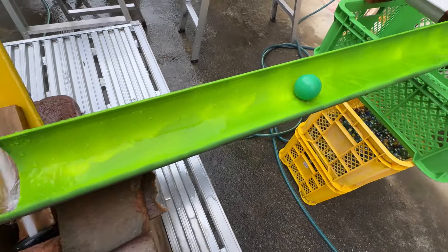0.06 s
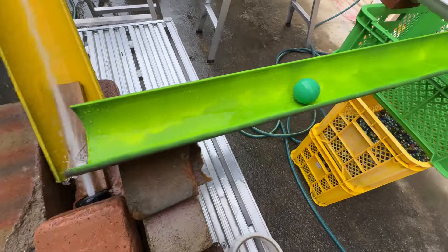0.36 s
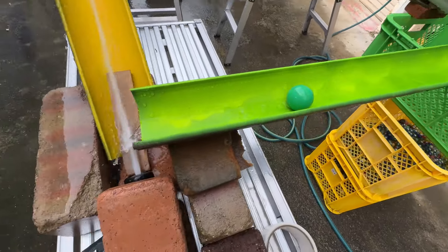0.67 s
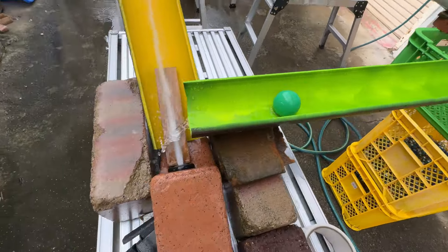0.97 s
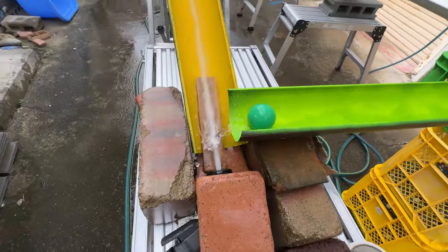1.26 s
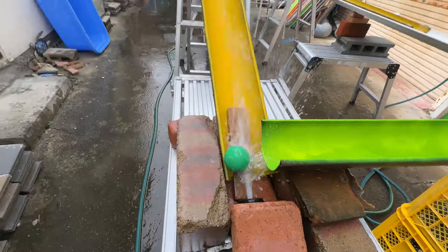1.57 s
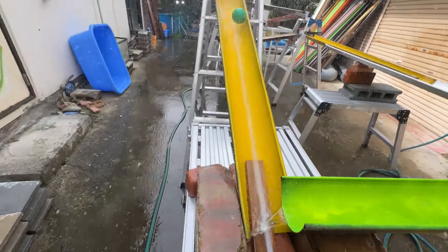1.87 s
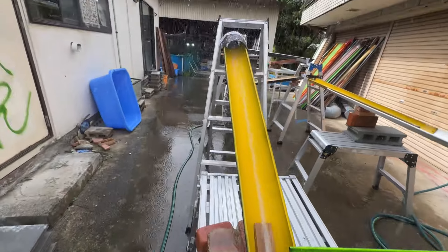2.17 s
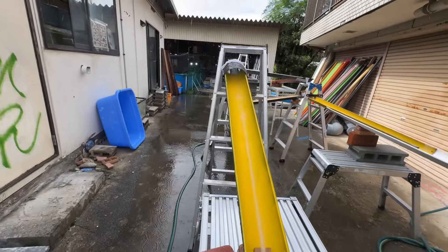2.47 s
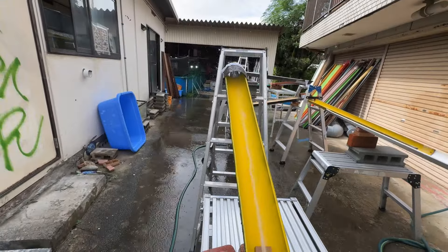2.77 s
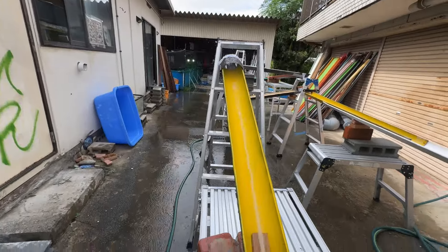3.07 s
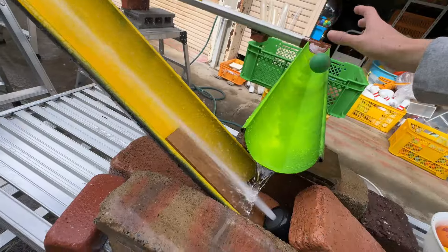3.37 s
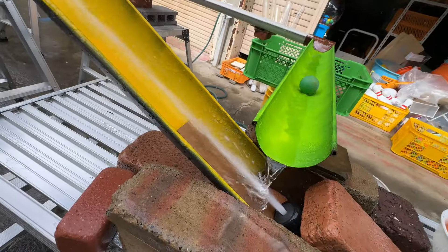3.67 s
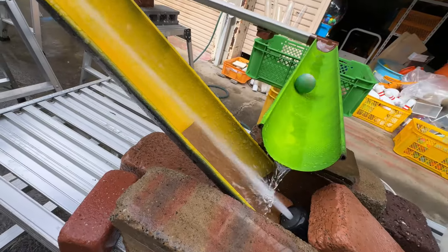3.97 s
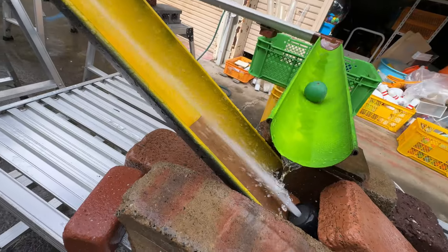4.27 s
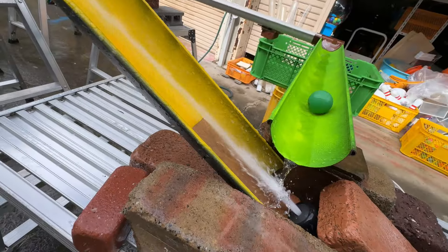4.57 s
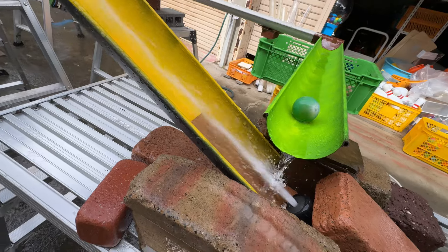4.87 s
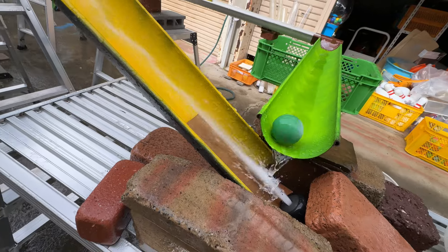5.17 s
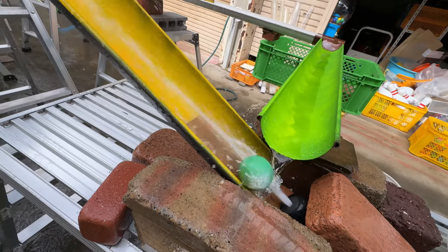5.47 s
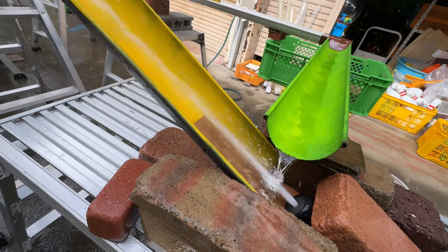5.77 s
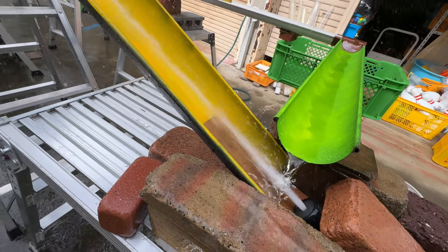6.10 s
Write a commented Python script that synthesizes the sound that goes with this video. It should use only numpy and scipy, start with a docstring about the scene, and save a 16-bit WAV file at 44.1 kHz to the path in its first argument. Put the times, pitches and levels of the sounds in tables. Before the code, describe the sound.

Close to a plastic gutter outdoors, pressurised water sprays with a constant bright hiss and hollow drumming. A wooden ball rolls with a low drone, lands with a clack and chatters off up the slope on the jet. After some small drips the spray shifts in tone, and another ball knocks onto the chute, rolls softly, clacks into the gutter and is swept off with short splashes. Wind rumbles lightly on the microphone.

```python
"""A pressure-washer jet hisses and drums up a plastic gutter in a yard, heard from the gutter's foot as
gusts rumble on the microphone. A wooden ball drones down a side chute, knocks into the gutter at 1.5 s,
is caught by the jet and skids and clatters away up the slope, while the microphone tilts to look up it.
A few drips plop. At 3.15 s the microphone is suddenly at the gutter's side. A ball rolls down again,
knocks in at 5.35 s and is driven away too, among splashes."""
import sys
import numpy as np
from scipy import signal
from scipy.fft import rfft, irfft
from scipy.io import wavfile

SR = 44100
rng = np.random.default_rng(int(sys.argv[2]) if len(sys.argv) > 2 else 0)


def int16_out(signal):
    """Quantize to a 16-bit WAV file."""
    q = np.round(np.clip(np.atleast_2d(signal).T, -1, 1) * 32767)
    wavfile.write(sys.argv[1], SR, q.astype(np.int16))


N = 275184
TIME = np.arange(N) / SR
HZ = np.maximum(np.arange(N // 2 + 1) * SR / N, 1)

# Where the microphone is. Each row: time in seconds, share at the foot, share looking up.
# The share left over is at the side.
MIC_PLACE = [(0, 0.96, 0), (1.55, 1, 0), (1.83, 0.028, 0.82), (3.148, 0.12, 0.99), (3.156, 0.29, 0.058),
             (6.24, 0.4, 0)]
# The tone of the water from those three places. Each row: frequency in Hz, left dB, right dB.
# Water drumming on the gutter wall:
DRUM_FOOT = [(100, -41, -15), (307, -14, -15), (533, -8, -9.5), (680, -1, -1.5), (860, -6.5, -5),
             (1050, -3, -7), (1380, -0.1, -3), (1820, -0.5, -15), (2010, -4, -4), (2590, -16, -27)]
DRUM_UP = [(100, -29, -29), (298, -14, -15.5), (537, -11, -11.5), (670, -3.5, -3), (920, -10.5, -6.5),
           (1050, -4, -2), (1500, -2, -11), (1860, 1.5, -5.5), (2015, -1, -17), (2620, -48, -37)]
DRUM_SIDE = [(98, -36, -31), (194, -10, -13), (326, -12.5, -10.5), (520, -7, -11), (680, -4.5, -21),
             (930, -4, -17), (1020, -2.5, -2.5), (1450, 1, -12), (1740, -1.5, -3), (1890, -6.5, -15),
             (2570, -22, -22)]
# The spray:
SPRAY_FOOT = [(1790, -23, -29), (2320, -13.5, -13.5), (2800, -9, -10.5), (4530, -4.5, -11.5),
              (5150, 0.5, -12.5), (6250, -4.5, -5), (6470, 2, -7), (7230, -4.5, -6), (7680, -1, 0),
              (9050, -0.5, -1.5), (9400, -8, 5.5), (9530, -7.5, -0.5), (10860, -9.5, -11.5),
              (11800, -29.5, -29.0)]
SPRAY_UP = [(1740, -26, -35), (2270, -8.5, -10), (2880, -11.5, -16), (3550, -11.5, -16.5),
            (4970, -5, -12.5), (5360, 1, -11), (6050, -7.5, -14), (7600, -6.5, -7), (8200, -7, -7),
            (9300, -9, 2), (9700, -9, -0.5), (10900, -11, -8), (11800, -32.4, -30.6)]
SPRAY_SIDE = [(1830, -58, -42), (2290, -13.5, -10), (2920, -4.5, -8.5), (3580, -3, -9.5), (4380, 1, -3),
              (4450, 4.5, -10), (5300, 1.5, -2), (5750, -5.5, -5), (6300, 2, -0.5), (7300, -10.5, -4.5),
              (7800, -2.5, -1.5), (9100, -2, -0.5), (10100, -0.5, 2), (10970, -24, -10),
              (12000, -32.6, -18)]
# The thin hiss of the nozzle:
NOZZLE_FOOT = [(10300, -30, -30), (11430, -7, -4.5), (12100, -2.5, -5.5), (12900, -2, 1), (13600, -5, -6.5),
               (14600, -4, -4.5), (15600, -9, -8), (19000, -20, -20)]
NOZZLE_UP = [(10300, -27, -22.7), (11300, -1, 0), (12100, -2, -3.5), (13000, -5, -3), (14000, 0, -0.2),
             (14600, 1, -0.0), (15500, -2, -0.3), (19000, -22.1, -22.3)]
NOZZLE_SIDE = [(10100, -33.4, -8.5), (11160, -25, -6), (11900, -11, -14), (12100, -1, -4), (12550, 1, 0),
               (12900, -6, -3), (13600, -5, -6), (14500, -4, -5), (15500, -5, -4), (19000, -12, -13)]
# How the microphone's two openings hear the water. Each row: frequency in Hz, how alike they are
# from 0 to 1, how far the left is ahead in radians.
MIC_OPENINGS = [(100, 0.9, -2.5), (330, 0.8, 1.14), (794, 0, 1.5), (1770, 0.59, 3), (2650, 0.13, 1),
                (4000, 0.47, 2.0), (5030, 0.08, 2.5), (6430, 0.5, 0.44), (9280, 0.22, 2.95),
                (9770, 0.53, 0.94), (11200, 0.55, 3.5), (12570, 0.97, 1.57), (14000, .82, 1.5),
                (15700, .8, 0.2)]
# How loud the even jet is as the microphone moves. Each row: time in seconds, then the levels of
# drumming, spray and nozzle in dB.
JET_LEVELS = [(0, -33.5, -26, -27.5), (.9, -33.5, -25.5, -27), (1.33, -33, -25.5, -23.5),
              (1.72, -31, -25, -25), (1.84, -33, -24.5, -27), (2.1, -31, -23.5, -27.2),
              (3.145, -32.8, -26, -28.5), (3.16, -33, -26, -23.5), (5.3, -33.3, -26, -24),
              (6.24, -32.5, -25, -25)]
# Peaks in the water's tone: standing waves in the gutter low down, and a faint, even ripple above 4 kHz. # Each
# row: frequency in Hz, width in Hz, boost in dB.
WATER_PEAKS = [(296, 23, 2), (641, 26, 3), (1022, 51, 3.5), (2030, 54, 2), (4610, 170, 2),
               (5540, 160, 1), (6570, 200, 1), (9200, 220, 0), (12540, 280, -1.5)]
# The tones of the yard's background, the chute, the wind and the fizz of water on a ball.
# Each row: frequency in Hz, left dB, right dB.
YARD_TONE = [(45, -4, -12), (70, -29, -9), (117, -0.5, 2), (170, -8, -9), (260, -16, -14)]
CHUTE_TONE = [(70, -16, -16), (120, -9, -5), (175, 2.5, 0), (260, -8, -0.5), (400, 1, -13)]
WIND_TONE = [(15, -25, -28), (29.8, -17, -18), (61.6, 2.5, -6.5), (100, -5, -9), (166, -8, -13.5),
             (254, -15.5, -31.5), (500, -48, -27)]
FIZZ_TONE = [(2400, -14, -16), (3400, -14, -18), (4470, -8, -10), (7150, -11, -9), (9100, -6, 1),
             (9800, -8, -9), (12000, -27, -22)]
# A ball rolls along. Each row: landing and leaving times in seconds, thud in dB, full-speed drone in dB.
ROLLS = [(0, 1.45, -62, -49.5), (1.489, 1.86, -39, -40.5), (3.428, 5.35, -30, -56),
         (5.351, 5.853, -46, -41.5)]
# Gusts on the microphone. Each row: time of the peak in seconds, swell time in seconds, level in dB.
GUSTS = [(.05, 0.11, -50), (0.356, 0.11, -39), (0.64, 0.053, -37.5), (0.824, 0.043, -40),
         (1.037, 0.061, -34.5), (1.13, 0.03, -29), (1.316, 0.12, -40), (1.8, .13, -42),
         (3.08, 0.061, -40.5), (5.3, 0.5, -46)]
# Splashes. Each row: time of the peak in seconds, middle frequency in Hz, swell time in seconds,
# level in dB.
SPLASHES = [(.45, 8500, .18, -35), (3.183, 3550, .019, -33), (3.29, 3880, 0.013, -30),
            (3.42, 3700, 0.014, -34), (3.431, 8000, 0.0053, -19.5), (4.526, 4740, .03, -30),
            (4.965, 3100, 0.02, -35), (4.964, 1300, 0.042, -34), (5.355, 3700, 0.0065, -31),
            (5.388, 6250, 0.046, -28.5), (5.387, 1350, .025, -33), (5.66, 8550, 0.026, -23),
            (5.685, 3700, 0.024, -27.5), (5.794, 3520, 0.0061, -24)]
# A ball hits the gutter. Each row: start in seconds, level in dB, main pitch in Hz, its rise in seconds,
# lower pitch in Hz, then in dB the lower pitch, crack, thump and ring, and left over right.
KNOCKS = [(1.4850, -5.5, 1700, 0.0006, 890, -8.5, -3, -19, -10.5, 3.5),
          (1.5135, -19.5, 1520, .001, 700, -10, -10, -9, -2, 9),
          (1.5840, -33, 1000, .001, 650, -6, -14, -20, -1, 2),
          (1.6163, -26, 1500, 0.0009, 690, -3, -4, -18, -7, 11),
          (1.7960, -23.5, 1870, 0.0012, 880, -6, -10, -21, 0, 10),
          (1.8200, -15, 1500, .00094, 830, -9, -22, -24, -8, 6),
          (1.9520, -13, 1310, 0.0017, 665, -4.5, -10, -14, -14, 0),
          (1.984, -21, 1400, 0.0016, 850, -6, -11, -3, -6, 7),
          (2.0093, -17, 1340, 0.0015, 656, -2.5, -12, -3, -5, 1),
          (2.0993, -9.5, 1370, 0.00088, 840, -6, -10, -0.5, -9.5, 1.5),
          (2.1508, -16.5, 1470, 0.00078, 694, -9, -14, 0, -9, 2),
          (3.399, -27, 3500, .0006, 1500, -1, 3, -30, -12, 13),
          (3.4323, -9, 1020, 0.0012, 714, -11, -1, -4, -14, 0.5),
          (5.351, -5.5, 1710, 0.0006, 1030, -5, -4.5, -18, -9, 5.5),
          (5.453, -16.5, 1130, 0.0012, 636, -9, -20, -31, -7.5, 5),
          (5.738, -23, 1410, 0.00083, 780, -0.5, -1, -11, -6, 12),
          (5.776, -14, 1700, 0.0011, 1165, -1, -13, -27, -5, 5),
          (5.791, -21, 1480, 0.0006, 670, 2, 9.5, 1, -7, 5),
          (5.8583, -25.5, 1050, 0.0016, 657, -2, -12, 9.5, 0, 3)]
# Echoes off the gutter, bricks and ladder. Each row: delay in seconds, level in dB.
ECHOES = [(.0055, -10.5), (0.012, -14), (.0163, -17)]
# The notes of the gutter's wall, and of the whole gutter flexing on its supports.
# Each row: pitch in Hz, level in dB, seconds to fade by 60 dB.
WALL_NOTES = [(480, -20, 0.12), (623, -20, 0.39), (836, -40, 0.11), (1118, -7.5, 0.061), (1328, -9, 0.099),
              (1444, -17, 0.11), (1640, -41, 0.063), (1780, -4.5, 0.074), (1918, -12, 0.059),
              (2568, -6, 0.032), (3045, -7.5, 0.051), (4500, -19, .04)]
FLEX_NOTES = [(122, -33, 0.09), (178, -23, 0.069), (257, -19, 0.051), (321, -13, 0.089),
              (360, -12.5, 0.069), (432, -12, 0.047)]
# The jet drives a ball up the gutter. Each row: time caught and time out of reach in seconds,
# then the levels of drumming, fizz and skid in dB.
LAUNCHES = [(1.581, 1.816, -32.5, -27, -35.5), (5.451, 5.685, -32.5, -26, -40)]
# Drips into the gutter. Each row: start in seconds, pitch in Hz, level in dB.
DRIPS = [(2.365, 714, -28.5), (2.461, 1820, -29), (2.604, 1960, -26), (2.745, 700, -37), (2.944, 750, -30)]

SKID_START_HZ, SKID_CLIMB_HZ = 1196, 701  # the skid climbs evenly as the ball spins up


def from_db(db):
    """Turn decibels into a number to multiply by."""
    return 10 ** (np.asarray(db) / 20)


def rms_one(x):
    """Scale a sound so that its average strength (rms) is 1."""
    return x / np.sqrt(np.mean(x ** 2) + 1e-20)


def in_time(rows):
    """Read each column of a table at every sample."""
    s, *columns = np.transpose(rows)
    return np.array([np.interp(TIME, s, c) for c in columns])


def in_hz(rows):
    """Read each column of a table at every frequency."""
    hz, *columns = np.transpose(rows)
    return np.array([np.interp(np.log(HZ), np.log(hz), c) for c in columns])


def drift(rate_hz):
    """A slow random wander, about 1 in size."""
    step, warm_up = 40, 2000
    r = np.exp(-2 * np.pi * rate_hz * step / SR)
    noise = rng.standard_normal(N // step + warm_up + 2)
    slow = signal.lfilter([1], [1, -2 * r, r * r], noise)[warm_up:]
    return np.interp(np.arange(N) / step, np.arange(len(slow)), rms_one(slow))


def colour(spectrum, tone):
    """Turn a spectrum into sound of strength 1, shaped by a tone table and cut off beyond its ends."""
    cut_ends = 1 / np.sqrt((1 + (tone[0][0] / HZ) ** 12) * (1 + (HZ / tone[-1][0]) ** 12))
    return rms_one(irfft(spectrum * from_db(in_hz(tone)) * cut_ends, N))


def stereo_noise(tone, shared):
    """Noise with a given tone; shared sets how much of it is the same left and right."""
    noise = rng.standard_normal((2, N)) + shared * rng.standard_normal(N)
    return colour(rfft(noise), tone)


def band(x, low_hz, high_hz):
    """Keep mostly what lies between two frequencies."""
    return signal.sosfilt(signal.butter(2, [low_hz, min(high_hz, SR * .45)], "band", fs=SR, output="sos"), x)


def later(x, seconds):
    """The same sound, delayed."""
    return np.interp(TIME - seconds, TIME, x, left=0)


def churning_water(spurt_db, spurt_hz, flicker_db, flicker_hz, drops_per_s, drop_size):
    """The spectrum of countless droplets and a few big drops, spurting together and flickering by band."""
    big_drops = (rng.random((2, N)) < drops_per_s / SR) * rng.uniform(-1.04, 1, (2, N))
    droplets = rfft(rng.standard_normal((2, N)) + drop_size * big_drops)
    spurts, water = spurt_db * drift(spurt_hz), 0
    edges_hz = [0, 500, 900, 1400, 2200, 3500, 5000, 6500, 8000, 10000, 12000, 13800, SR]
    for low, high in zip(edges_hz, edges_hz[1:]):
        one_band = irfft(droplets * ((HZ >= low) & (HZ < high)), N)
        water = water + one_band * from_db(spurts + flicker_db * drift(flicker_hz))
    common, opposite = rfft(water)
    alike, lead = in_hz(MIC_OPENINGS)
    ears = np.array([[1], [-1]])
    stereo = np.sqrt(1 + alike) * common + np.sqrt(1 - alike) * opposite * ears
    return stereo * np.exp(.5j * lead * ears)


def jet():
    """Drumming, spray and hiss change with the microphone's place; a ball adds drumming, fizz and skid."""
    water = churning_water(spurt_db=0.5, spurt_hz=14, flicker_db=1.18, flicker_hz=26,
                           drops_per_s=260, drop_size=6.2)
    water *= from_db(sum(db / (1 + (2 * (HZ - hz) / width) ** 2) for hz, width, db in WATER_PEAKS))
    foot, up = in_time(MIC_PLACE)
    shares = foot, up, np.clip(1 - foot - up, 0, 1)
    drum_db, spray_db, nozzle_db = in_time(JET_LEVELS)
    ball_drum, ball_fizz, ball_skid, skid_hz = launches(catch_s=0.037, escape_s=0.035, skid_growth_db=6)

    def heard(*tones):
        return sum(share * colour(water, tone) for share, tone in zip(shares, tones))

    drum = heard(DRUM_FOOT, DRUM_UP, DRUM_SIDE) * np.hypot(from_db(drum_db), ball_drum)
    spray = heard(SPRAY_FOOT, SPRAY_UP, SPRAY_SIDE) * from_db(spray_db)
    nozzle = heard(NOZZLE_FOOT, NOZZLE_UP, NOZZLE_SIDE) * from_db(nozzle_db)
    fizz = colour(rfft(rng.standard_normal((2, N))), FIZZ_TONE) * ball_fizz
    return drum + spray + nozzle + fizz + skid(skid_hz, width_hz=136, right_db=-9.5) * ball_skid


def yard_background(level_db):
    """The yard's steady, low noise."""
    return from_db(level_db) * stereo_noise(YARD_TONE, shared=1)


def rolling(thud_fade_s, drone_fade_s, speed_power):
    """A ball lands with a thud; the chute drones louder as it speeds up and settles once it has left."""
    level = np.zeros(N)
    for land_s, leave_s, thud_db, drone_db in ROLLS:
        speed = np.clip((TIME - land_s) / (leave_s - land_s), 0, 1)
        thud = (TIME >= land_s) * from_db(thud_db - 60 * np.maximum(TIME - land_s, 0) / thud_fade_s)
        settling_db = 60 * np.maximum(TIME - leave_s, 0) / drone_fade_s
        drone = speed ** speed_power * from_db(drone_db - settling_db)
        level = np.hypot(level, thud + drone)
    return stereo_noise(CHUTE_TONE, shared=1) * level


def wind(breeze_db, lumpy_db, lumpy_hz):
    """Gusts swell and fade over a light breeze, making a lumpy rumble on the microphone."""
    gusts = [from_db(db) * np.exp(-((TIME - s) / swell_s) ** 2 / 2) for s, swell_s, db in GUSTS]
    level = np.sqrt(from_db(breeze_db) ** 2 + np.sum(np.square(gusts), axis=0))
    return stereo_noise(WIND_TONE, shared=0.16) * level * from_db(lumpy_db * drift(lumpy_hz))


def splashes(band_ratio):
    """Water thrown off the gutter's rim or a wet ball makes short swells of hiss, a little to the left."""
    out = np.zeros((2, N))
    for s, hz, swell_s, db in SPLASHES:
        near = abs(TIME - s) < min(3 * swell_s, .5)
        noise = rng.standard_normal((2, SR + 1))[:, :near.sum()]
        hiss = rms_one(band(noise, hz / band_ratio, hz * band_ratio))
        out[:, near] += from_db(db) * hiss * np.exp(-((TIME[near] - s) / swell_s) ** 2)
    return out * from_db([[1.5], [-1.5]])


def pock(hz, rise_s):
    """A very short note that swells for rise_s and dies away at once."""
    t = TIME[:SR // 10]
    return t / rise_s * np.exp(1 - t / rise_s) * np.sin(2 * np.pi * hz * t)


def ringing(clicks, notes):
    """Each click sets fading notes ringing; every second note starts by swinging the other way."""
    out = 0
    for k, (hz, db, fade_s) in enumerate(notes):
        decay, turn = from_db(-60 / (fade_s * SR)), 2 * np.pi * hz / SR
        note = signal.lfilter([0, np.sin(turn)], [1, -2 * decay * np.cos(turn), decay ** 2], clicks + 1e-18)
        out = out + (-1) ** k * from_db(db) * note
    return out


def knocks(crack_s, lower_slowness, flex_lag_s, right_lag_s):
    """Each hit cracks, sounds two short notes at the spot, rings the wall and flexes the gutter."""
    clacks, flex_kicks, wall_kicks = np.zeros((3, 2, N))
    t = TIME[:SR // 10]
    click = signal.unit_impulse(len(t))
    for s, db, main_hz, rise_s, lower_hz, lower_db, crack_db, thump_db, ring_db, pan_db in KNOCKS:
        here = slice(round(s * SR), round(s * SR) + len(t))
        gain = from_db(db + pan_db * np.array([[.5], [-.5]]))
        crack = band(rng.standard_normal((2, len(t))) * np.exp(-t / crack_s), 1900, 5500)
        spot = pock(main_hz, rise_s) + from_db(lower_db) * pock(lower_hz, rise_s * lower_slowness)
        clacks[:, here] += gain * (spot + from_db(crack_db) * crack / abs(crack).max())
        wall_kicks[:, here] += gain * from_db(ring_db) * band(click, main_hz / 2.8, main_hz * 3.1)
        flex_kicks[:, here] += gain * from_db(thump_db) * click
    echoes = np.array([sum(from_db(db) * later(ear, s) for s, db in ECHOES) for ear in clacks])
    left, right = clacks + echoes + ringing(wall_kicks, WALL_NOTES)
    # long bending waves travel slowly, so the thump comes after the clack
    thump = np.array([later(ear, flex_lag_s) for ear in ringing(flex_kicks, FLEX_NOTES)])
    return np.array([left, later(right, right_lag_s)]) + thump


def with_yard_echo(sound, level_db, fade_s):
    """The yard answers a sound with a short wash of echoes."""
    t = TIME[:SR // 2]
    build_up = 1 - np.exp(-t / 0.0015)
    tail = rng.standard_normal((2, len(t))) * from_db(-60 * t / fade_s) * build_up
    tail /= np.sqrt(np.sum(tail ** 2, axis=1, keepdims=True))
    return sound + from_db(level_db) * signal.fftconvolve(sound, tail, axes=1)[:, :N]


def launches(catch_s, escape_s, skid_growth_db):
    """While the jet drives a ball: how strong its drumming, fizz and skid are, and the skid's pitch."""
    drum, fizz, slip = np.zeros((3, N))
    hz = np.full(N, float(SKID_START_HZ))
    for caught_s, free_s, drum_db, fizz_db, skid_db in LAUNCHES:
        fade_in = np.clip((TIME - caught_s) / catch_s + .5, 0, 1)
        fade_out = np.clip((free_s - TIME) / escape_s + .5, 0, 1)
        contact = fade_in * fade_out
        spin = np.clip((TIME - caught_s) / (free_s - caught_s), 0, 1)
        drum += contact * from_db(drum_db)
        fizz += contact * from_db(fizz_db)
        slip += contact * from_db(skid_db + skid_growth_db * spin)
        hz = np.where(contact > 0, SKID_START_HZ + SKID_CLIMB_HZ * spin, hz)
    return drum, fizz, slip, hz


def skid(hz, width_hz, right_db):
    """A rough note that climbs as the jet spins the ball up the gutter."""
    smooth = signal.butter(2, width_hz, fs=SR, output="sos")
    wobble = rms_one(signal.sosfilt(smooth, rng.standard_normal((2, N))))
    phase = 2 * np.pi * np.cumsum(hz) / SR
    return (wobble[0] * np.cos(phase) + wobble[1] * np.sin(phase)) * from_db([[0], [right_db]])


def rattle(taps_per_s, level_db, spread_db, rise_s, octaves_below):
    """The driven ball chatters on the gutter: uneven taps, to the left, pitched below its skid."""
    out = np.zeros(N)
    for caught_s, free_s, *_ in LAUNCHES:
        for k, (when, size, drop) in enumerate(rng.random((40, 3))):
            after_s = (k + when) / taps_per_s
            spin = after_s / (free_s - caught_s)
            if spin < 1:
                hz = (SKID_START_HZ + SKID_CLIMB_HZ * spin) * 2 ** (-octaves_below * drop)
                tap, at = pock(hz, rise_s), round((caught_s + after_s) * SR)
                out[at:at + len(tap)] += from_db(level_db + spread_db * (2 * size - 1.5)) * tap
    return out * from_db([[2.5], [-2.5]])


def drips(rise_s):
    """Single drops fall into the gutter with short plops."""
    out = np.zeros(N)
    for s, hz, db in DRIPS:
        plop, at = from_db(db) * pock(hz, rise_s), round(s * SR)
        out[at:at + len(plop)] += plop
    return out


def scene():
    """Add up the balls, the yard, the water and the wind."""
    hits = knocks(crack_s=0.003, lower_slowness=1.3, flex_lag_s=0.00525, right_lag_s=0.00011)
    balls = with_yard_echo(hits, level_db=-4.5, fade_s=0.18)
    balls += rolling(thud_fade_s=0.29, drone_fade_s=0.94, speed_power=1.45)
    balls += rattle(taps_per_s=45, level_db=-29, spread_db=1, rise_s=0.0011, octaves_below=0.92)
    yard = yard_background(level_db=-54.5)
    water = jet() + drips(rise_s=0.0032) + splashes(band_ratio=1.164)
    return balls + yard + water + wind(breeze_db=-59.5, lumpy_db=1.3, lumpy_hz=5.3)


def record(dry):
    """The microphone dips at two narrow frequencies, and the highest treble is cut."""
    for notch_hz, width_hz, depth in [(5213, 134, 1.0), (9500, 140, .62)]:
        notched = signal.lfilter(*signal.iirnotch(notch_hz, notch_hz / width_hz, fs=SR), dry)
        dry = dry + depth * (notched - dry)
    cutoff_hz = 15720
    return signal.sosfilt(signal.ellip(14, .1, 90, cutoff_hz, fs=SR, output="sos"), dry)


dry = scene()
out = record(dry)
int16_out(out)
```